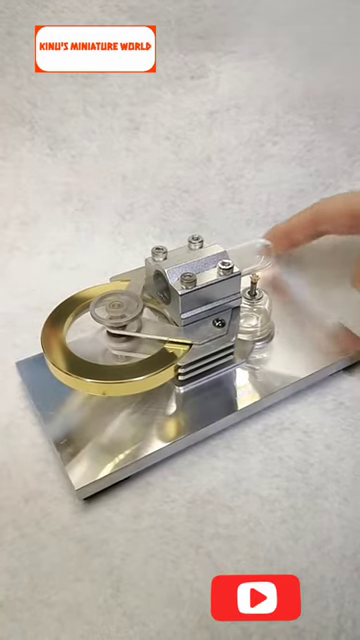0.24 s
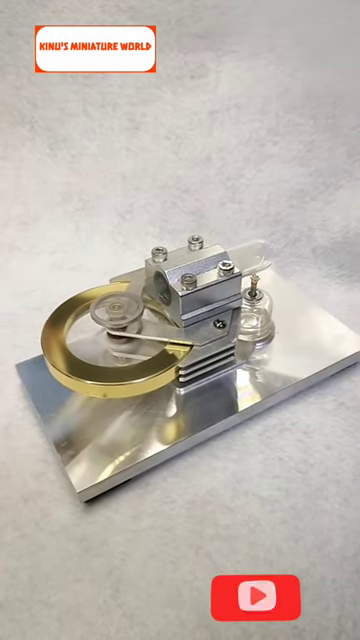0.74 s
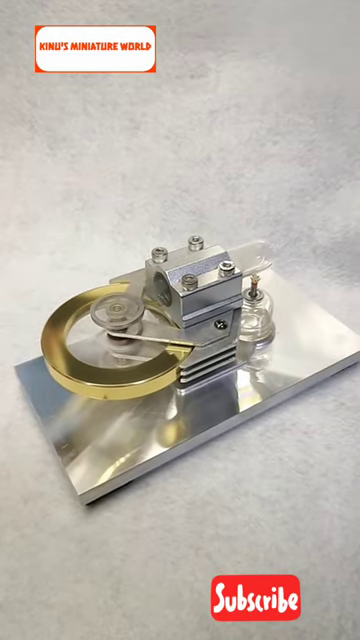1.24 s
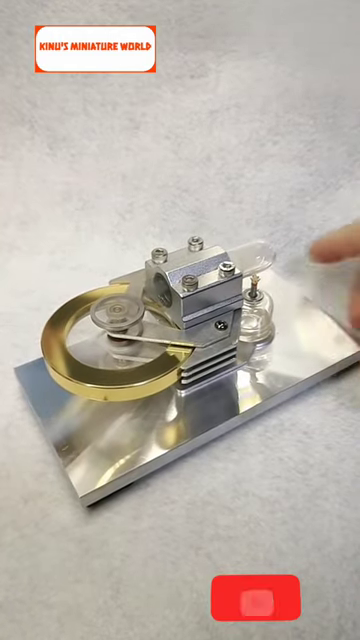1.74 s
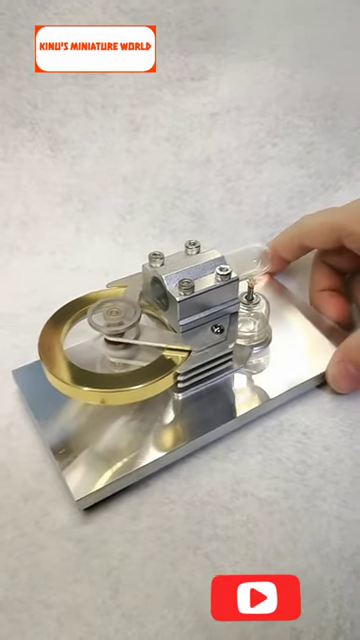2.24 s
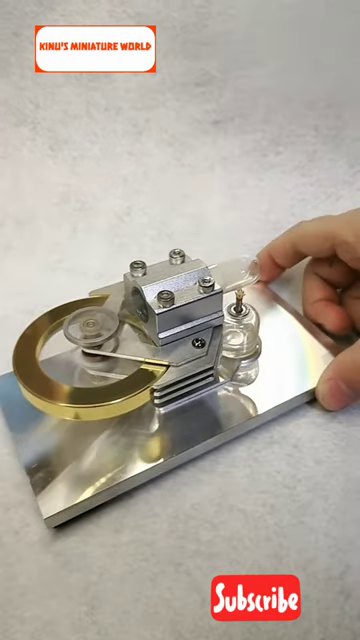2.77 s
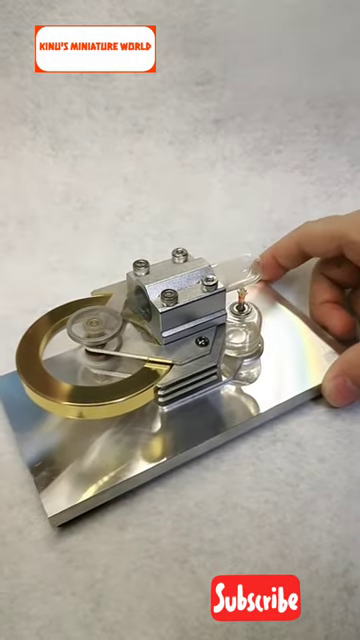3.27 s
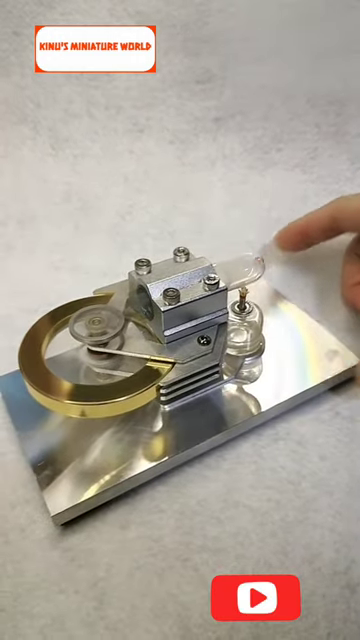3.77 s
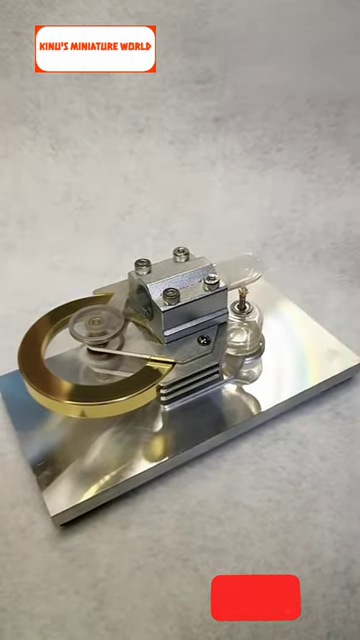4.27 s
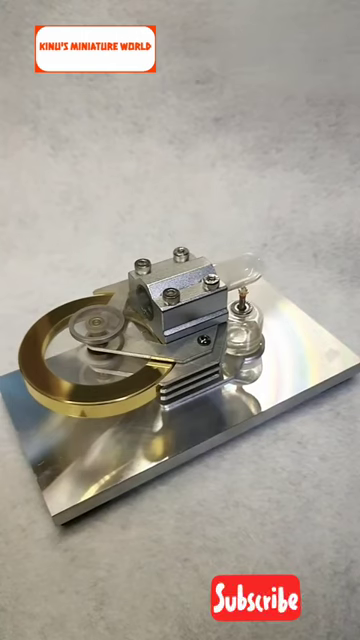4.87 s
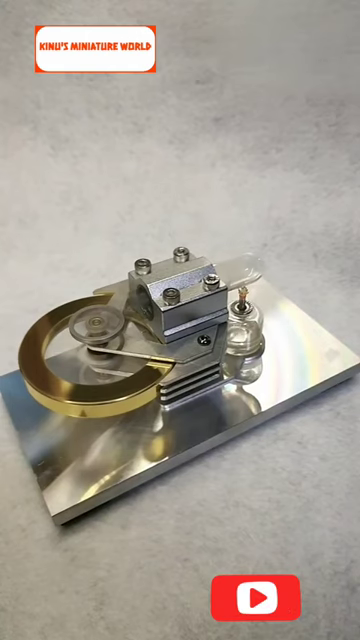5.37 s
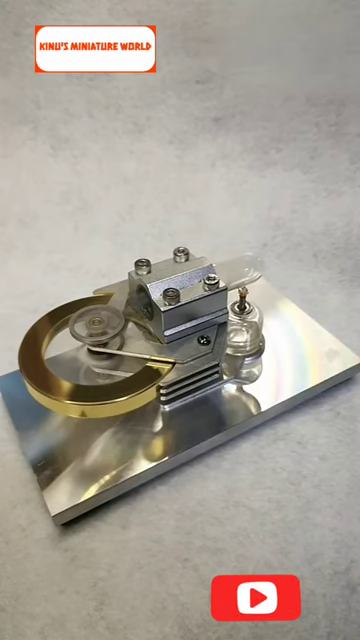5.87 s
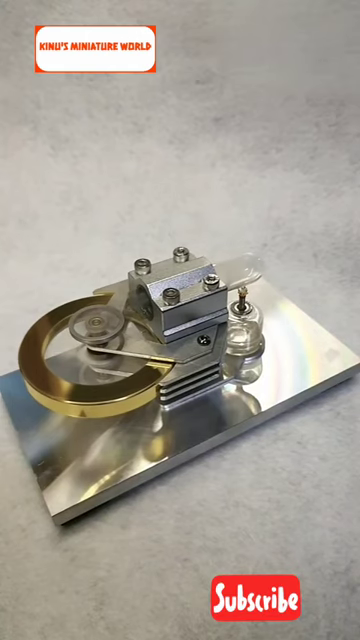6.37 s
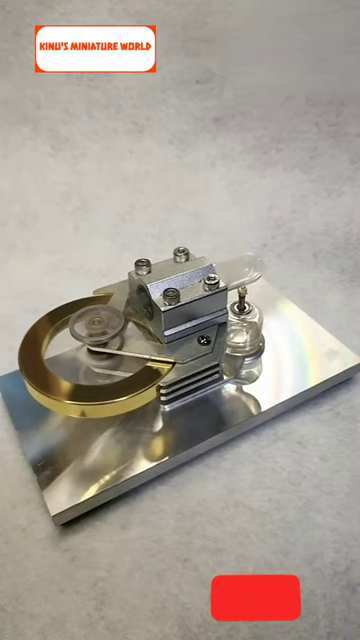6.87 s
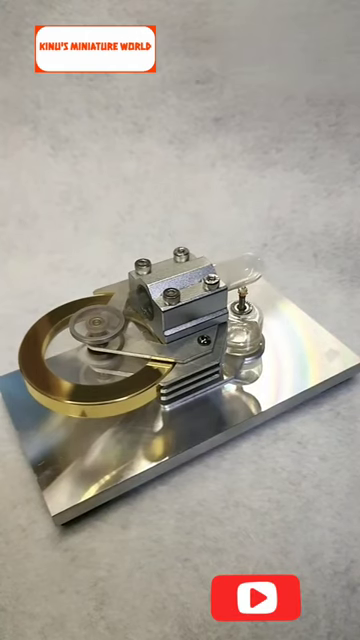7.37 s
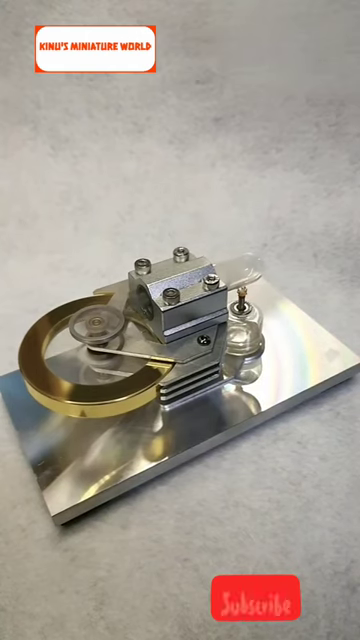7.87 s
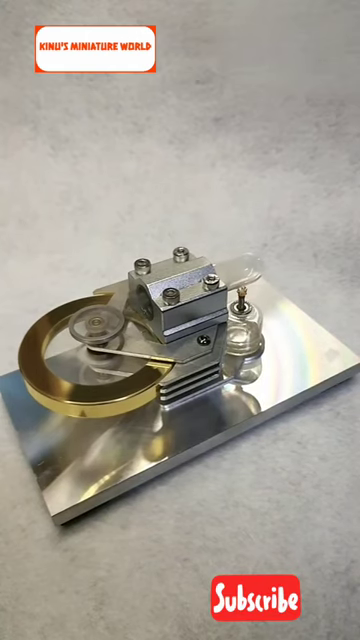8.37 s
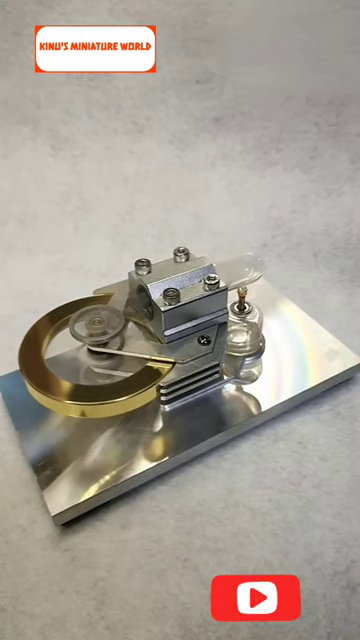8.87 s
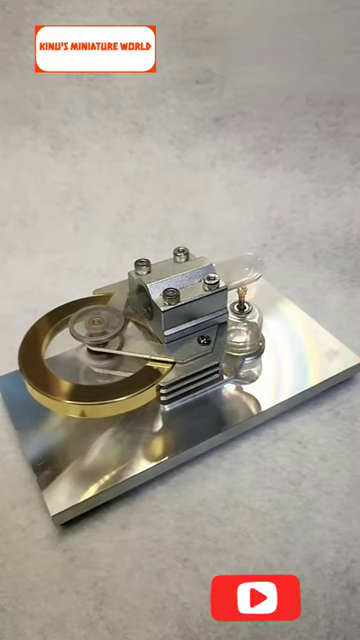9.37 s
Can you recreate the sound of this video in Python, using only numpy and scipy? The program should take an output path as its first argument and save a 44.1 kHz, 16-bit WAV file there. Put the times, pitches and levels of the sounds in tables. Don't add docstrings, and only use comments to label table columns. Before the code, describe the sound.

A tiny metal hot-air engine runs nonstop up close, a fast rattling buzz of clattering joints over a low table hum, slowing very slightly.

```python
import sys
import numpy as np
from scipy import signal
from scipy.fft import rfft, irfft
from scipy.io import wavfile

SR = 44100
rng = np.random.default_rng(int(sys.argv[2]) if len(sys.argv) > 2 else 0)


def log_audio(samples):
    frames = np.atleast_2d(samples).T
    limited = np.clip(frames, -1, 1)
    pcm = np.round(limited * 32767).astype(np.int16)
    wavfile.write(sys.argv[1], SR, pcm)


def nominal_scale(level):
    x = np.asarray(level, float) / 20
    return 10 ** x


N = 423801
TIME_S = np.arange(N) / SR


def evened(x):
    return x / np.sqrt(np.mean(x ** 2) + 1e-20)


def curve(rows):
    s, value = np.transpose(rows)
    return np.interp(TIME_S, s, value)


def coloured(x, points):
    f, db = np.transpose(points)
    hz = np.fft.rfftfreq(len(x), 1 / SR)
    gain = nominal_scale(np.interp(np.log(hz + 1), np.log(f + 1), db))
    return evened(irfft(rfft(x) * gain, len(x)))


def ring(force, modes):
    t = np.arange(SR // 8) / SR
    body = np.zeros(len(t))
    for k, (hz, width_hz, db) in enumerate(modes):
        decay = width_hz * np.exp(-np.pi * width_hz * t)
        body += (-1) ** k * nominal_scale(db) * decay * np.sin(2 * np.pi * hz * t)
    return evened(signal.oaconvolve(force, body)[:N])


def wander(hz):
    pole = np.exp(-2 * np.pi * hz / SR)
    return evened(signal.lfilter([1], [1, -2 * pole, pole ** 2], rng.standard_normal(N)))


# start_s [s], speed_hz [turns/s]
CRANK_SPEED = [(0, 49.987), (0.5, 49.914), (2, 49.531), (2.4, 49.447), (4, 49.035), (6, 48.682),
               (9.62, 48.133)]


def crank():
    speed_hz = curve(CRANK_SPEED)
    return speed_hz, .3946 + np.cumsum(speed_hz) / SR


# start_s [s], passes [balls per turn]
BALL_PASSES = [(0, 2.217), (1, 2.188), (1.6, 2.182), (2, 2.16), (3, 2.151), (4, 2.157), (9.62, 2.1572)]


def bearing(speed_hz):
    return -.1 + np.cumsum(speed_hz * curve(BALL_PASSES)) / SR


# frame_db, plate_db, block_db, rattle_db [dB]
KNOCK_FORCE = [
    (-1.5, 0, -2, -2),
    (-12, -9, -1, -3),
    (0, -20, -2.5, 3),
    (-12, -20, -5, 0),
    (-3, -16, -13, -1.5),
    (-5, -16, -13, 0),
    (-7, -8, -13, -10),
]
KNOCK_ANGLE = [.035, .085, .625, .715, .81, .87, .955]
KNOCK_SCATTER = [.0012, .003, .001, .003, .0015, .003, .004]
KNOCK_SIGN = [1, 1, -1, -1, -1, -1, 1]


def joints(turns, balls):
    spread_db, beat_db = (1.2, 1.3, 1.3, 2.0), (.8, 2.5, 1.2, 1.4)
    whole = np.arange(np.ceil(turns[0]) - 1, turns[-1])
    chance = rng.standard_normal((len(whole), len(KNOCK_FORCE), 6)).clip(-2, 2)
    force = np.zeros((4, N))
    for k, part_db in enumerate(KNOCK_FORCE):
        angle = KNOCK_ANGLE[k] + KNOCK_SCATTER[k] * chance[:, k, 0]
        at = np.searchsorted(turns, whole + angle)
        inside = (at > 0) & (at < N)
        at, luck = at[inside], chance[inside, k]
        beat = np.cos(2 * np.pi * balls[at])
        for p, db in enumerate(part_db):
            uneven = 0.38 * luck[:, 1] + 1.68 * luck[:, 2 + p]
            force[p, at] += KNOCK_SIGN[k] * nominal_scale(db + beat_db[p] * beat + spread_db[p] * uneven)
    return force


def chatter(force, t60_s, grain_db, idle):
    t = np.arange(SR // 16) / SR
    decay = nominal_scale(-60 * t / t60_s) * (1 - np.exp(-t / .0003))
    shower = evened(signal.oaconvolve(abs(force), decay)[:N])
    grains = rng.standard_normal(N) * nominal_scale(grain_db * rng.exponential(1, N).clip(0, 5))
    return evened((shower + idle) * grains)


# pitch_hz [Hz], width_hz [Hz], level_db [dB]
FRAME_MODES = [(680, 20, -15), (1014, 310, 4.5), (1025, 43, -10), (1168, 113, 18.5), (1434, 64, 21.5),
               (1564, 148, 16)]


def frame_ring(force):
    blows = evened(force) + .6 * chatter(force, .05, 1.2, .5)
    return nominal_scale(-27.5 + .5 * wander(2.1)) * ring(blows, FRAME_MODES)


# pitch_hz [Hz], width_hz [Hz], level_db [dB]
PLATE_MODES = [(1812, 30, 0)]


def plate_ring(force, turns):
    rise_db_per_s = 0.38
    level_db = -29 + rise_db_per_s * TIME_S + .5 * wander(1.1)
    free = 1 - .7 * np.exp(-((turns % 1 - .7) / .17) ** 4)
    blows = evened(force) + .32 * chatter(force, .05, .8, .4)
    return nominal_scale(level_db) * evened(free * ring(blows, PLATE_MODES))


# pitch_hz [Hz], width_hz [Hz], level_db [dB]
BLOCK_MODES = [(2610, 480, -19), (3060, 180, -12), (3486, 247, -0.5), (3863, 277, -0.5)]


def block_ring(force):
    blows = evened(force) + .9 * chatter(force, .008, .8, .3)
    return nominal_scale(-21.3 + .5 * wander(2.1)) * ring(blows, BLOCK_MODES)


# pitch_hz [Hz], width_hz [Hz], level_db [dB]
SMALL_PART_MODES = [(4820, 130, -11), (5430, 120, -3), (5910, 70, -6), (6100, 65, -6), (6575, 14, -3),
                    (6686, 14, -3), (7360, 120, -8), (7757, 60, 1), (8560, 150, -5), (8790, 60, -4),
                    (8950, 120, -6), (13050, 140, -19), (13650, 220, -17), (14155, 14, -13),
                    (14266, 14, -13), (14850, 200, -19)]
# pitch_hz [Hz], level_db [dB]
RATTLE_SPECTRUM = [(1500, -6), (2200, -3), (3000, 0.5), (4500, -6.5), (5500, -2.5), (6900, 1), (8000, 4.5),
                   (9200, 1), (9600, -4), (11300, -4.5), (11900, -11), (12400, -12), (14000, -8.5),
                   (15500, -11.5)]


def rattle(force):
    level_db = -19.5 + .5 * wander(2.1)
    blows = chatter(force, .024, 2.2, .35) + .45 * evened(force)
    out = nominal_scale(level_db - 3.1 + .6 * wander(5.0)) * ring(blows, SMALL_PART_MODES)
    out += nominal_scale(level_db - 3.0) * coloured(chatter(force, .04, 2.0, .7), RATTLE_SPECTRUM)
    snap = chatter(force, 0.0023, 1.7, 0.022)
    return out + nominal_scale(level_db - 10.0) * coloured(snap, RATTLE_SPECTRUM)


def engine(turns, balls):
    frame, plate, block, loose = joints(turns, balls)
    out = frame_ring(frame) + plate_ring(plate, turns) + block_ring(block) + rattle(loose)
    return signal.sosfilt(signal.butter(5, 700, "high", fs=SR, output="sos"), out)


# start_s [s], seating [0 loose - 1 firm]
BASE_SEATING = [
    (0, .4),
    (.3, 0.2),
    (1.4, 0.14),
    (1.8, 0.36),
    (2.5, 0),
    (2.8, 0.54),
    (3.3, 0.6),
    (3.7, 1),
    (9.62, 0.95),
]


def seating():
    return curve(BASE_SEATING).clip(0, 1)


def pinch():
    centre_s, half_s = 2.37, 0.19
    return np.exp(-((TIME_S - centre_s) / half_s) ** 4)


def between(loose_db, seated_db, seat):
    return loose_db + (seated_db - loose_db) * seat


def rocking(push, seat):
    loose = nominal_scale(-41.5) * (1 - seat) * np.sin(-push - 1.9)
    creep = nominal_scale(-54) * np.maximum(TIME_S - 2.1, 0)
    return (loose + creep * np.sin(-push)) * nominal_scale(1.4 * wander(6.0))


def twice_hum(push, seat):
    level_db = between(-33, -28, seat) - 2 * pinch()
    return nominal_scale(level_db + .7 * wander(3.0)) * np.cos(2 * push)


# multiple [crank speeds added], level_db [dB]
BEARING_TONES = [(0, 3), (1.002, -10), (2, -6), (3, -1.5), (3.999, -22)]


def bearing_hum(turns, balls, seat):
    base_db = between(-38, -41, seat) - 17.5 * pinch()
    out = np.zeros(N)
    for k, db in BEARING_TONES:
        tone = np.cos(2 * np.pi * (balls + k * turns))
        out += nominal_scale(base_db + db + 1.5 * wander(3.0)) * tone
    return out


# multiple [crank speeds], level_db [dB]
SHAKE_HARMONICS = [(1, -13), (2, 0), (3, -10.5), (4, -14.5), (5, -7), (6, -15.5), (7, -16), (8, -32),
                   (9, -37), (10, -21), (11, -18), (12, -19.5), (13, -64), (14, -47), (15, -15.5),
                   (16, -9.5)]
SEATED_GAIN = {4: 7, 6: 3.3, 7: -2, 11: -1.9, 12: -4.5, 15: 0.85, 16: -4}


def higher_hum(push, seat):
    high_db = between(-37, -37, seat)
    out = np.zeros(N)
    for k, db in SHAKE_HARMONICS[2:]:
        level_db = high_db + 8 + db + SEATED_GAIN.get(k, 0) * (seat - .5)
        if k == 5:
            level_db = between(-32.5, -42, seat) - 4.5
        lag = .015 * k ** 2 + 1.66 * k + .7
        level = nominal_scale(level_db + 1.2 * wander(6.0))
        out += level * np.cos(k * push - lag + .18 * wander(6.0))
    return out


# pitch_hz [Hz], level_db [dB per Hz]
RUMBLE_SPECTRUM = [(12, -39), (20, 0), (44, -23), (103, 5), (146, -1.5), (273, -3), (433, -14.5),
                   (524, -14.5), (634, -30), (767, -26), (900, -53), (1170, -49), (1980, -120)]


def rumble():
    return nominal_scale(-35 + 1.5 * wander(4.1)) * coloured(rng.standard_normal(N), RUMBLE_SPECTRUM)


def table(turns, balls):
    seat = seating()
    push = 2 * np.pi * (turns - .5)
    hum = rocking(push, seat) + twice_hum(push, seat)
    hum += bearing_hum(turns, balls, seat) + higher_hum(push, seat)
    return np.sqrt(2) * hum + rumble()


def scene():
    speed_hz, turns = crank()
    balls = bearing(speed_hz)
    return (engine(turns, balls) + table(turns, balls))[None]


def low_pass(x):
    return signal.sosfilt(signal.butter(12, 15990, fs=SR, output="sos"), x)


def record(dry):
    limited = 1.2 * np.tanh(dry / 1.2) + .009
    edge = signal.firwin(1023, 15740, window=("kaiser", 9), fs=SR)
    mix = signal.oaconvolve(limited, edge[None], "same")
    return low_pass(mix)


dry = scene()
out = record(dry)
log_audio(out)
```